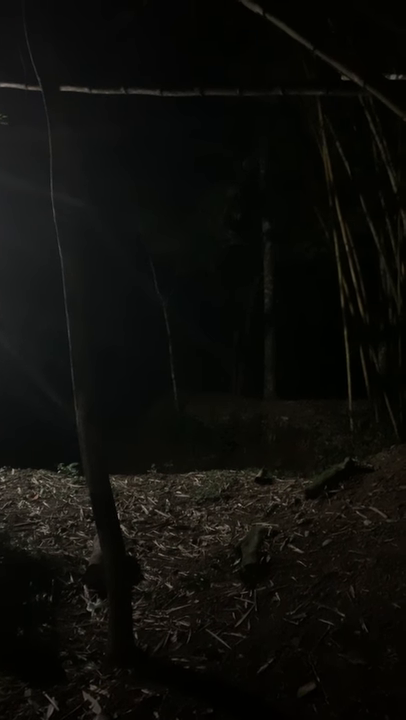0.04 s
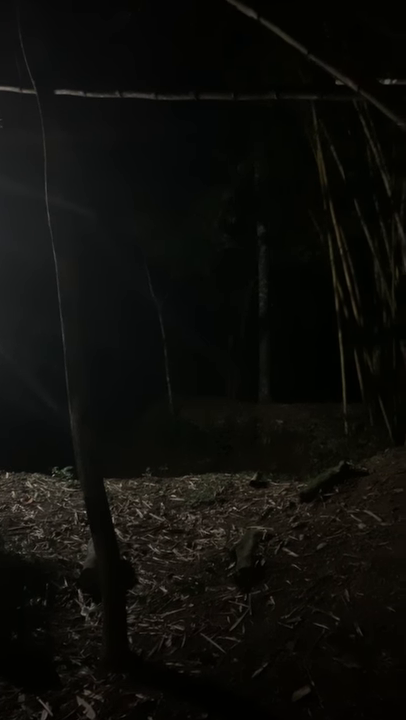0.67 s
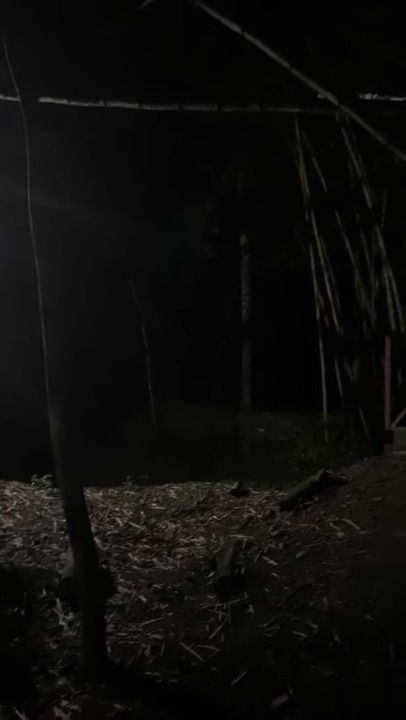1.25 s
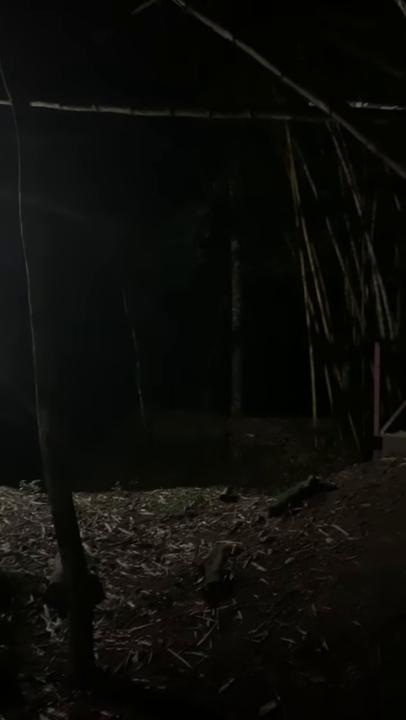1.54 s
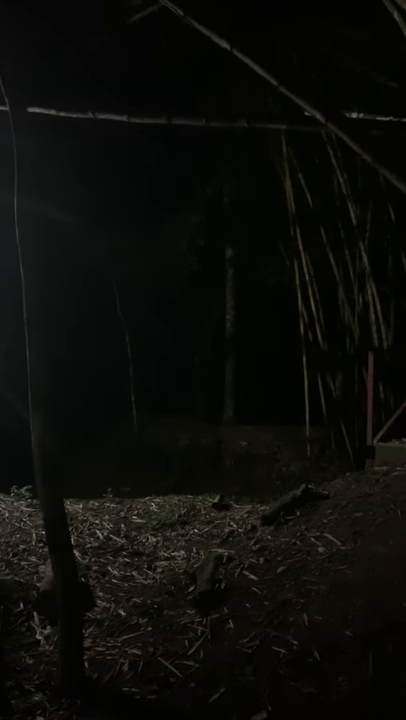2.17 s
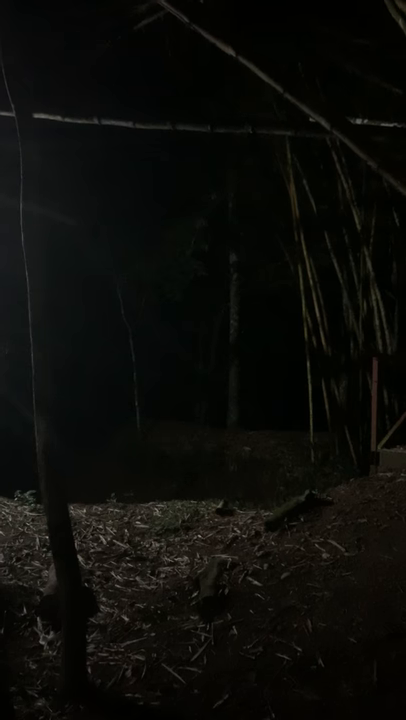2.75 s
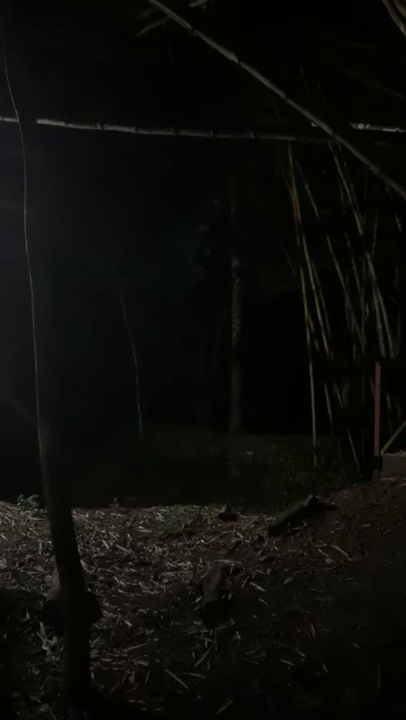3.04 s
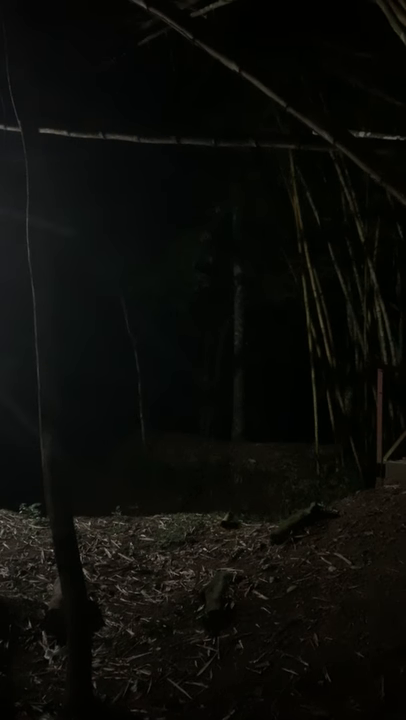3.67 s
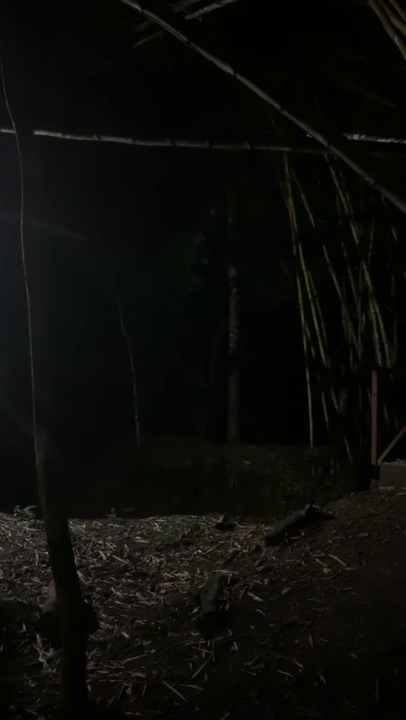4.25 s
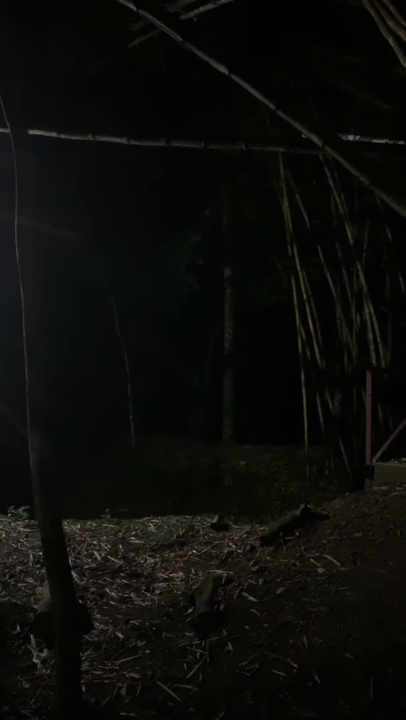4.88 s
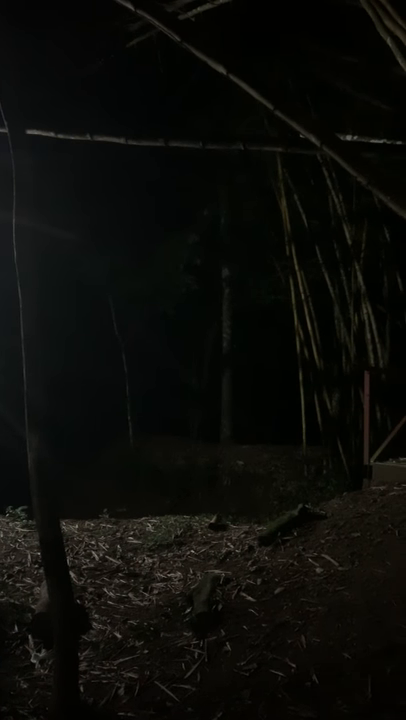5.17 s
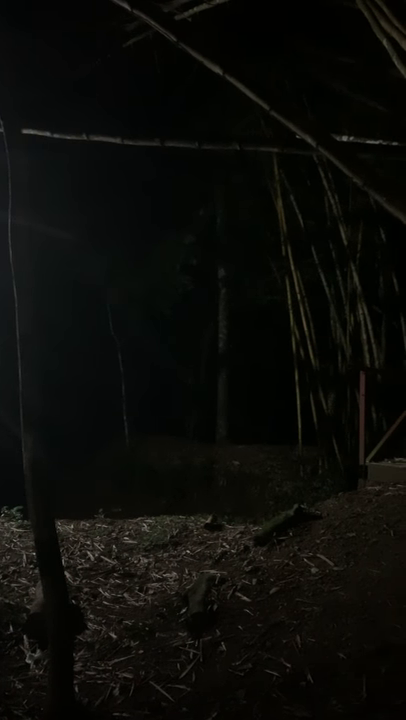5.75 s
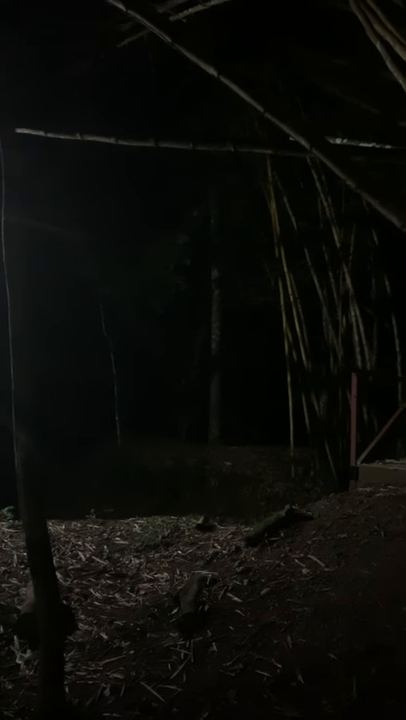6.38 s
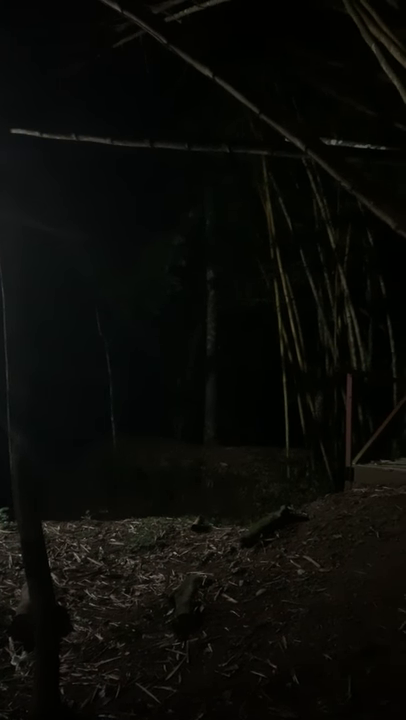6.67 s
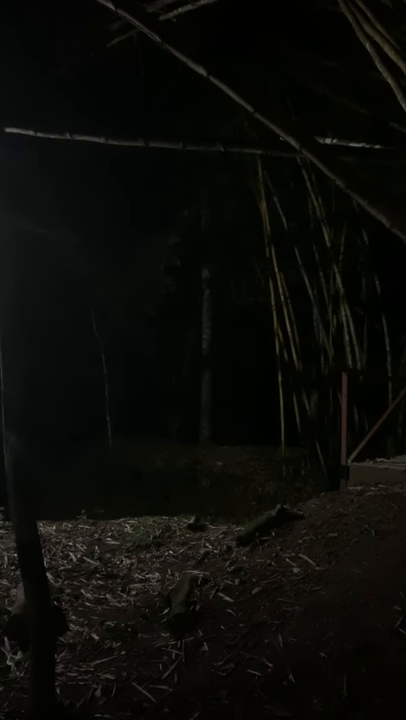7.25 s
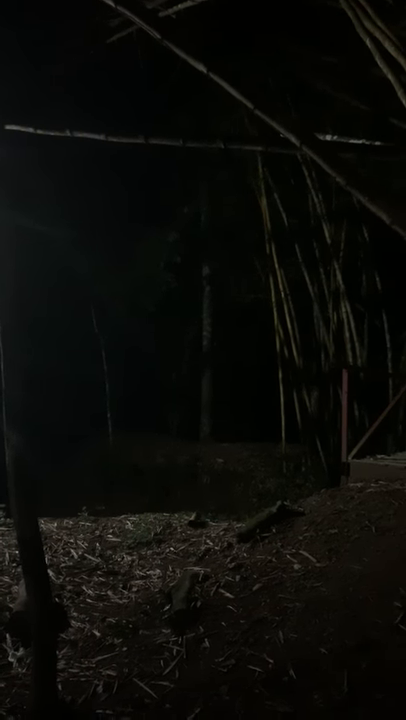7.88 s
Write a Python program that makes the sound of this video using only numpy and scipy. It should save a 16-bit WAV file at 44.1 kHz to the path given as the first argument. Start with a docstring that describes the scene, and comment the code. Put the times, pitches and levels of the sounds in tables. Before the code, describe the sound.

Insects chirr and crickets trill in a jungle at night while distant howler monkeys give ragged roars and hoots, then fade.

```python
"""Howler monkeys roar some way off in a night forest, die away, and start again softly.
Ragged vocal-fold pulses ring the throat sac and mouth; at times the voice locks into a clear hoot.
Far insects chirr throughout; nearer crickets trill over them with their wings.
A thin whistle rises once, something dry rustles, and the hand-held microphone picks up
a low rumble and a few bumps."""
import sys
import numpy as np
from scipy import signal
from scipy.fft import rfft, irfft
from scipy.io import wavfile
from scipy.ndimage import uniform_filter1d

SR = 44100
rng = np.random.default_rng(int(sys.argv[2]) if len(sys.argv) > 2 else 0)


def generate_wav(signal):
    """Clip the signal to [-1, 1] and save it as 16-bit WAV at the path in sys.argv[1]."""
    frames = np.transpose(np.atleast_2d(signal))
    scaled = np.clip(frames, -1, 1) * 32767
    pcm = np.round(scaled).astype(np.int16)
    wavfile.write(sys.argv[1], SR, pcm)


N = 353241
TIME = np.arange(N) / SR
BINS_HZ = np.fft.rfftfreq(N, 1 / SR)

# Wing tones of three chirping crickets. Each row: pitch in Hz, relative level in dB.
HIGH_CHIRP = [(5222, -9), (5310, -12), (5410, -7), (5513, 0), (5612, -9), (5722, -6)]
LOW_CHIRP = [(5228, -10), (5335, -3), (5437, -6), (5536, 0)]
FAST_CHIRP = [(5025, -14), (5224, 0), (5428, -3), (5625, -6)]


def amp(db):
    """Decibels to gain."""
    return 10 ** (np.asarray(db) / 20)


def unit(x):
    """Scale to rms 1."""
    return x / np.sqrt(np.mean(abs(x) ** 2) + 1e-20)


def read(points, hz):
    """Interpolate a table on a log-frequency axis."""
    points_hz, values = np.transpose(points)
    return np.interp(np.log(hz + 1), np.log(points_hz + 1), values)


def curves(rows):
    """One curve per column after the time column; end values hold."""
    times_s, *columns = np.transpose(rows)
    return [np.interp(TIME, times_s, column) for column in columns]


def during(start_s, end_s, fade_s):
    """Gate: 1 from start to end, linear fades outside."""
    return np.clip(np.minimum(TIME - start_s, end_s - TIME) / fade_s + 1, 0, 1)


def envelope(start_s, length_s, attack_s, release_db_per_s):
    """Linear rise, hold, exponential decay."""
    rise = np.clip((TIME - start_s) / attack_s, 0, 1)
    return rise * amp(-release_db_per_s * np.clip(TIME - start_s - length_s, 0, 2))


def wander(rate_hz):
    """Smooth random curve, rms 1."""
    return unit(irfft(rfft(rng.standard_normal(N)) * np.exp(-(BINS_HZ / rate_hz) ** 2), N))


def add(mix, start_s, sound):
    """Mix a sound in, in place."""
    part = mix[max(round(start_s * SR), 0):][:len(sound)]
    part += sound[:len(part)]


def blend(calls):
    """Merge (gain, Hz) curves: powers add, the loudest dominates the pitch."""
    power = sum(gain ** 2 + 1e-20 for gain, hz in calls)
    return np.sqrt(power), sum((gain ** 2 + 1e-20) * hz for gain, hz in calls) / power


def resonate(x, hz, width_hz, order=2):
    """Steep resonance following a frequency curve, rms 1."""
    carrier = np.exp(2j * np.pi * np.cumsum(hz * np.ones(N)) / SR)
    pole = np.exp(-np.pi * width_hz / SR)
    baseband = x / carrier
    for _ in range(order):
        baseband = signal.lfilter([1 - pole], [1, -pole], baseband)
    return unit((carrier * baseband).real)


def sustained(x, window_samples=4000):
    """Level out slow changes, keep fast flutter."""
    return x / np.sqrt(abs(uniform_filter1d(x ** 2, window_samples)) + 1e-6)


def diffuse(pair, spread=1):
    """Correlate two signals as sound from ahead (spread 0) or all round (1)."""
    # Microphone ports in a diffuse field. Each row: frequency in Hz, coherence from 0 to 1.
    coherence = [(100, 1), (230, 0.93), (460, 0.5), (700, 0.36), (1200, 0.14), (2000, 0.69), (3000, 0.87),
                 (4500, 0.94), (6000, 0.91)]
    a, b = rfft(pair)
    same = np.clip(1 - spread * (1 - read(coherence, BINS_HZ)), 0, 1)
    return irfft(np.array([a, same * a + np.sqrt(1 - same ** 2) * b]), N)


def wash(spectrum):
    """Diffuse stereo noise of a given spectrum, rms 1."""
    white = rfft(rng.standard_normal((2, N)))
    return unit(diffuse(irfft(white * amp(read(spectrum, BINS_HZ)), N)))


def forest(x, wet_db, spread=1, tail_samples=32768, echoes_per_s=2000):
    """Direct sound plus sparse echoes from trunks and canopy."""
    # Each row: frequency in Hz, time to decay 60 dB in seconds.
    decay_times = [(200, 0.62), (900, 1), (3000, 1), (7000, 0.6), (14000, 0.45)]
    taps = rng.standard_normal((2, tail_samples)) * (rng.random((2, tail_samples)) < echoes_per_s / SR)
    hz, t, spectra = signal.stft(taps, SR, nperseg=256)
    decay = amp(-60 * t / read(decay_times, hz)[:, None]) * (t > .01)
    tail = signal.istft(spectra * decay, SR, nperseg=256)[1]
    echoes = signal.fftconvolve(x[None], tail, axes=1)[:, :N]
    wet = unit(diffuse(echoes, spread)) * x.std()
    return (x + amp(wet_db) * wet) / np.hypot(1, amp(wet_db))


def folds(pulse_hz, jitter=.25, breath=.5, uneven_db=5.5):
    """Slack vocal folds slap unevenly, each slap with a puff of air. Returns drive and throb."""
    turns = np.cumsum(pulse_hz * np.exp(jitter * wander(45))) / SR
    cycle = np.floor(turns).astype(int)
    force = unit(amp(uneven_db * rng.random(N))[cycle])
    slaps = np.diff(cycle, prepend=0)
    puffs = (2.4 + np.exp(-(turns % 1) / .5)) * rng.standard_normal(N)
    drive = force * ((1 - breath) * unit(slaps) + breath * unit(puffs))
    return drive, force * np.sin(np.pi * turns) ** 2


def howl(drive, throb, hz, width_hz, tone_share, wobble, depth):
    """A resonance both rung by the pulses and sounding by itself, swelling once per pulse."""
    phase = 2 * np.pi * np.cumsum(hz * (1 + wobble * wander(59.3))) / SR
    tone = unit(np.sin(phase) * (1 - depth + depth * throb))
    ring = resonate(drive, hz, width_hz)
    return sustained(np.sqrt(tone_share) * tone + np.sqrt(1 - tone_share) * ring)


def gestures(sac_sag=.1, widest_at=.807):
    """Gain and pitch curves of the roars: the mouth opens, then closes, as the sac's pitch sinks."""
    # Roars and growls. Each row: start and length in seconds, relative sac, mouth and bray levels
    # in dB, then sac, first mouth and last mouth resonance in Hz.
    roars = [(-.1, 0.7, -40, -36.5, -55, 469.2, 913.2, 863.4),
             (0.479, 0.38, -41.5, -35.5, -52.5, 435.4, 897.3, 875.5),
             (0.818, 0.31, -48, -49, -52, 405, 870, 843.2),
             (1.069, .24, -39, -38.5, -57, 462.5, 944.3, 898.3),
             (1.24, 0.42, -40.5, -32, -54.5, 446, 895.4, 837.1),
             (1.6, 0.21, -44.5, -47.5, -55.5, 374.6, 841, 822.6),
             (1.817, 0.3, -47, -45, -58.5, 445, 852, 843),
             (2.027, 0.43, -39.5, -37.5, -60, 469.4, 882.7, 824),
             (2.429, .13, -43, -47, -62.5, 446.6, 784, 726.3),
             (2.83, .3, -49.5, -50, -74, 443.6, 784.6, 689),
             (3.104, 0.2005, -52.5, -51, -96, 442.2, 725, 710),
             (3.275, 0.16, -56, -55, -74.5, 432, 736, 702), (3.44, 0.29, -59.5, -63.5, -74, 425, 709, 692),
             (3.777, 0.273, -66.5, -66, -72, 424, 838, 749),
             (7.511, 0.3, -63.5, -93.5, -102, 417, 694, 720), (7.84, 0.45, -60.5, -60, -107, 434, 715, 706)]
    sac, mouth, bray_power = [], [], 0
    for start_s, length_s, sac_db, mouth_db, bray_db, sac_hz, first_hz, last_hz in roars:
        push = envelope(start_s, length_s, attack_s=.0877, release_db_per_s=109.5)
        progress = np.clip((TIME - start_s) / length_s, 0, 1)
        glide = progress ** 1.2
        open_db = np.interp(progress, [0, widest_at, 1], [-5.5, 0, -4.5])
        sac.append((amp(sac_db) * push, sac_hz * (1 - sac_sag * glide)))
        mouth.append((amp(mouth_db + open_db) * push, first_hz + (last_hz - first_hz) * glide))
        bray_power += (amp(bray_db) * push) ** 2
    return (*blend(sac), *blend(mouth), np.sqrt(bray_power))


def roar(mouth_rest_hz=850, bray_air=1.1, highpass_hz=190):
    """Fold pulses ring the throat sac, the mouth and the upper throat resonances (the bray)."""
    # Weak modes beside the sac; bray modes. Each row: centre in Hz, width in Hz, relative level in dB.
    sac_modes = [(248.7, 38.5, -16), (342.6, 52, -23.5), (500.7, 12, -11.5), (582, 99, -13.5),
                 (709, 74, -14.5)]
    bray_modes = [(1092, 210, -4.5), (1233, 70, -7), (1346.4, 100, -5), (1825, 150, -11),
                  (2730, 400, -18.5), (3100, 160, -14), (3695, 730, -17.5), (4350, 2100, -7)]
    drive, throb = folds(pulse_hz=64 * np.exp(.16 * wander(5)))
    sac_gain, sac_hz, mouth_gain, mouth_hz, bray_gain = gestures()
    effort = np.interp(20 * np.log10(sac_gain), [-62, -42], [.2, 1])  # soft calls are breathier
    jaw = (1 + .015 * wander(4.3)) * (mouth_hz / mouth_rest_hz) ** .25  # modes partly track the mouth

    def ring(source, modes):
        return sum(amp(db) * resonate(source, hz * jaw, width_hz, order=3) for hz, width_hz, db in modes)

    surge = amp(-2 + 2.26 * wander(93))
    sac_hz = sac_hz * (1 + .00683 * wander(8.42))
    sac = howl(drive, throb, sac_hz, width_hz=142, tone_share=.7 * effort, wobble=.023, depth=.5)
    sac = surge * sac + ring(drive, sac_modes)
    mouth_hz = mouth_hz * (1 + .018 * wander(13.91))
    mouth = howl(drive, throb, mouth_hz, width_hz=149, tone_share=.62 * effort, wobble=.02777, depth=.62)
    bray = ring(unit(drive + bray_air * rng.standard_normal(N)), bray_modes)
    voice = sac_gain * sac + amp(-1.26) * mouth_gain * mouth + bray_gain * bray
    return signal.sosfilt(signal.butter(4, highpass_hz, "high", fs=SR, output="sos"), voice)


def rasp(flutter_db=3):
    """A narrow, pulsing high note cuts in and out when the mouth gapes."""
    # Each row: start and length in seconds, first and last pitch in Hz, relative level in dB.
    rasps = [(-.05, 0.083, 2165, 2155, -59), (.52, 0.054, 1995, 2006, -53.5),
             (0.6, 0.053, 1939, 1944, -58.5), (0.67, .05, 1990, 2010, -51), (0.789, 0.059, 1930, 1963, -54),
             (0.863, 0.063, 1990, 1980, -49.5), (0.972, 0.038, 2015, 2000, -55),
             (1.029, 0.041, 1943, 1916, -49), (1.254, .04, 2210, 2175, -62),
             (1.317, 0.044, 2137, 2100, -57), (1.397, .24, 2095, 2054, -60.5), (1.68, 0.2, 1813, 1723, -67),
             (2.5, 0.2, 1784, 1770, -75.5), (7.88, 0.023, 2037, 1994, -76)]
    calls = []
    for start_s, length_s, first_hz, last_hz, db in rasps:
        push = amp(db) * envelope(start_s, length_s, attack_s=.015, release_db_per_s=317)
        calls.append((push, np.interp(TIME, [start_s, start_s + length_s], [first_hz, last_hz])))
    gain, hz = blend(calls)
    drive, throb = folds(pulse_hz=64)
    note = howl(drive, throb, hz, width_hz=130, tone_share=.66, wobble=.009, depth=.6)
    return gain * unit(amp(flutter_db * wander(27))) * note


def chorus(level_db=-56, throb_db=.84, chirr_db=.85):
    """Countless far insects merge into a band of chirring."""
    # Each row: time in seconds, level change in dB.
    swell = [(0, 1), (.8, -1), (2.8, 1.5), (4.7, 1), (5.1, -1.5), (5.55, 1.5), (6.1, 0.5), (8, .5)]
    # Each row: frequency in Hz, relative density in dB.
    spectrum = [(2900, -28.5), (3500, -23.5), (3900, -12), (4200, -6), (4700, -9.5), (5200, -5.5),
                (5700, -4), (6150, 1.5), (6600, -6.5), (7000, -13), (7400, -22.5), (7800, -28.5),
                (8400, -52.5)]
    gain = amp(level_db + curves(swell)[0] + throb_db * wander(20) - chirr_db * wander(220))
    return gain * wash(spectrum)


def rumble(air_db=-57, hum_hz=74, bump_s=.0069):
    """Night air, a distant wavering hum and soft bumps of the hand on the microphone."""
    # Each row: frequency in Hz, relative density in dB.
    air_spectrum = [(20, -2), (55, 1.5), (100, -1), (170, -3.5), (300, -11.5), (550, -19.5), (800, -23.5),
                    (1100, -32.5), (1400, -29), (2000, -43.5), (2700, -46.5), (8000, -62.5), (10500, -39.5),
                    (15000, -58)]
    # Each row: time in seconds, level in dB.
    hum_levels = [(0, -53.5), (1.5, -64.5), (3.2, -57.5), (4.5, -65), (8, -66.5)]
    # Each row: time in seconds, pitch in Hz, peak in dB.
    hand_bumps = [(1.295, 44, -37.5), (1.689, 38.7, -45.5), (4.655, 56, -46)]
    hum = amp(curves(hum_levels)[0]) * sustained(resonate(rng.standard_normal(N), hum_hz, width_hz=7.6))
    air = amp(air_db + 1.23 * wander(13)) * wash(air_spectrum)
    bumps = sum(amp(db) * np.exp(-((TIME - at_s) / bump_s) ** 2) * np.cos(2 * np.pi * hz * (TIME - at_s))
                for at_s, hz, db in hand_bumps)
    return air + hum + bumps


def far_forest(patchy_db=2):
    """Faint, patchy stirring deep among the trees."""
    # Each row: time in seconds, level in dB.
    levels = [(4.3, -69), (4.6, -87.5), (5.2, -99), (5.85, -70), (6.4, -81.5), (7.15, -83), (7.6, -91)]
    # Each row: centre in Hz, width in Hz, relative level in dB.
    modes = [(420, 83, 1), (776, 170, 0), (1505, 230, -15)]
    patches = sum(amp(db + patchy_db * wander(24)) * resonate(rng.standard_normal(N), hz, width_hz)
                  for hz, width_hz, db in modes)
    return amp(curves(levels)[0]) * unit(patches)


def hoots(octave_db=-20, octave_top_hz=1000, fade_s=.013):
    """The voice locks onto the sac or mouth resonance, almost pure; low hoots keep a weak octave."""
    # Each row: start and end in seconds, first and last pitch in Hz, relative level in dB.
    calls = [(0.021, 0.067, 457, 466, -34.5), (0.1, 0.166, 468, 456, -37.5),
             (0.173, 0.211, 446, 443, -34.5), (0.244, 0.284, 435, 441, -29),
             (0.299, 0.34, 454.5, 423, -36.5), (0.508, 0.545, 442, 459, -40.5),
             (0.59, 0.712, 350.4, 325.5, -45.5), (0.682, 0.707, 890, 860, -33),
             (0.892, 1.04, 387, 394.7, -32.5), (1.064, 1.152, 398, 425.6, -38),
             (1.154, 1.285, 460, 438, -41), (1.385, 1.433, 876.2, 890, -39.5),
             (1.435, 1.481, 290, 281, -44), (1.572, 1.674, 350, 341, -37.5),
             (1.594, 1.668, 867, 825, -33.5), (1.695, 1.81, 395, 364, -54), (1.836, 1.887, 284.1, 256, -45),
             (1.943, 2.107, 264.6, 261.5, -51), (2.095, 2.188, 471.6, 449, -38.5),
             (2.393, 2.478, 828.4, 803, -36.5), (2.431, 2.484, 250, 230.5, -46.5),
             (2.445, 2.65, 439, 410.3, -39.5), (2.572, 2.666, 733, 709, -47),
             (2.833, 2.874, 424.5, 415, -42), (2.894, 2.954, 419.3, 409, -40),
             (2.969, 3.09, 420, 417.5, -45), (3.102, 3.279, 415, 400.9, -49.5)]
    out = np.zeros(N)
    waver = 1 + .011 * wander(40)
    flutter = amp(2.5 * wander(30))
    for start_s, end_s, first_hz, last_hz, db in calls:
        hz = np.interp(TIME, [start_s, end_s], [first_hz, last_hz]) * waver
        phase = 2 * np.pi * np.cumsum(hz) / SR
        octave = amp(octave_db) * (2 * first_hz < octave_top_hz)
        gate = during(start_s + fade_s, end_s - fade_s, fade_s)
        out += amp(db) * gate * (np.sin(phase) + octave * np.sin(2 * phase))
    return out * flutter


def trill(length_s, tones, pitch_ratio=1, strokes_per_s=100, rise_s=.035, fade_s=.075):
    """Wing strokes sound as a few close, scratchy tones; each sways and swells on its own."""
    detune_hz, swell_db, roughness = 5, 3, .13
    t = np.arange(0, length_s, 1 / SR)
    strokes_s = np.arange(0, length_s, 1 / strokes_per_s)
    song = 0
    for hz, db in tones:
        sway, swell = np.sin(2 * np.pi * (rng.uniform(1.5, 5, (2, 1)) * t + rng.random((2, 1))))
        pitch_hz = hz * pitch_ratio + detune_hz * rng.standard_normal()
        per_stroke = rng.standard_normal((2, len(strokes_s)))
        force, slip = (roughness * np.interp(t, strokes_s, values) for values in per_stroke)
        phase = 2 * np.pi * (pitch_hz * t + .14 * sway + rng.random()) + slip
        song = song + amp(db + swell_db * swell) * (1 + force) * np.sin(phase)
    return unit(song * np.clip(np.minimum(t / rise_s, (length_s - t) / fade_s), 0, 1))


def crickets(chirp_s=.35, far_db=-68, far_detune=.05, far_count=36):
    """Near crickets chirp and trill over fainter ones at random times."""
    # Each row: start in seconds, wing tones, level in dB.
    chirps = [(0.12, HIGH_CHIRP, -57.5), (0.619, LOW_CHIRP, -58), (1.373, HIGH_CHIRP, -54.5),
              (1.95, LOW_CHIRP, -55.5), (2.428, HIGH_CHIRP, -57.5), (3.19, LOW_CHIRP, -57),
              (3.299, HIGH_CHIRP, -59), (4.3, FAST_CHIRP, -57), (4.541, LOW_CHIRP, -53),
              (4.6, HIGH_CHIRP, -55.5), (5.631, HIGH_CHIRP, -54), (6.211, LOW_CHIRP, -56.5),
              (6.797, HIGH_CHIRP, -53.5), (7.493, LOW_CHIRP, -57), (7.935, HIGH_CHIRP, -56)]
    # Wing tones of two trilling crickets. Each row: pitch in Hz, relative level in dB.
    wide_trill = [(4875, -2), (4937, -2), (4995, -10), (5057, -6), (5120, -10), (5178, -10), (5233, -2.5),
                  (5292, -7), (5412, -8)]
    centred_trill = [(4845, -8), (4895, -8), (4960, -13), (5020, -5), (5078, 0), (5135, -9), (5215, -9),
                     (5268, -5)]
    # Longer, lower songs. Each row: start and length in seconds, wing tones, level in dB.
    trills = [(.558, .72, wide_trill, -51), (3.123, .57, centred_trill, -52),
              (5.157, .8, wide_trill, -51.5), (7.294, .65, centred_trill, -57),
              (7.685, .4, wide_trill, -51)]
    out = np.zeros(N)
    for when, extra_s, pitch in rng.random((far_count, 3)):
        song = trill(.18 + extra_s, LOW_CHIRP, pitch_ratio=1 + far_detune * (pitch - .5))
        add(out, when * N / SR, amp(far_db) * song)
    for start_s, tones, db in chirps:
        add(out, start_s, amp(db) * trill(chirp_s, tones))
    for start_s, length_s, tones, db in trills:
        add(out, start_s, amp(db) * trill(length_s, tones))
    return out


def scratch(length_s, hz, width_hz):
    """A band of hiss that swells and fades, rms 1."""
    offset = (np.fft.rfftfreq(SR, 1 / SR) - hz) / width_hz
    band = irfft(rfft(rng.standard_normal(SR)) / (1 + offset ** 2) ** 3)
    note = band[:int(length_s * SR)]
    return unit(note * signal.windows.tukey(len(note), .6))


def pips_and_buzzes():
    """Single insects give sharp pips and longer buzzes."""
    # Each row: start in seconds, pitch in Hz, level in dB.
    pips = [(0.649, 7320, -63), (0.761, 7210, -65), (1.13, 7330, -66), (1.478, 7230, -59.5),
            (1.54, 7160, -67), (2.711, 7200, -63.5), (2.91, 7350, -65), (3.159, 4490, -53.5),
            (3.31, 7370, -64.5), (3.453, 4230, -54), (3.62, 7230, -61), (3.702, 7200, -67),
            (4.61, 7400, -70.5), (4.76, 7170, -64.5), (5.721, 7340, -63.5), (6.71, 7160, -59),
            (7.799, 7360, -61), (7.88, 7350, -60.5)]
    # Each row: start and length in seconds, pitch and width in Hz, level in dB.
    buzzes = [(1.979, 0.68, 4410, 1500, -62.5), (2.253, 0.14, 14070, 420, -64),
              (4.14, 0.26, 3910, 25, -67.5), (4.616, .55, 15200, 1190, -82),
              (5.351, 0.52, 4460, 560, -60.5), (6.125, .11, 14000, 600, -72.5)]
    out = np.zeros(N)
    for start_s, hz, db in pips:
        add(out, start_s, amp(db) * scratch(length_s=.048, hz=hz, width_hz=140))
    for start_s, length_s, hz, width_hz, db in buzzes:
        add(out, start_s, amp(db) * scratch(length_s, hz, width_hz))
    return out


def ticks():
    """Tiny high ticks, perhaps from dry leaves."""
    # Each row: start in seconds, level in dB.
    events = [(.8, -90), (1.385, -84), (2.265, -79), (2.98, -86), (3.15, -75)]
    out = np.zeros(N)
    for start_s, db in events:
        add(out, start_s, amp(db) * scratch(length_s=.008, hz=12500, width_hz=5000))
    return out


def whistle(trim_db=-2, width_hz=150, third_db=-21, sputter_db=3.6):
    """A fuzzy whistle with weak overtones glides upward."""
    # Each row: time in seconds, pitch in Hz, relative level in dB.
    glide = [(2.671, 866, -73), (2.73, 1050, -57), (2.8, 1285, -64), (2.88, 1340, -62.5),
             (2.931, 1470, -56), (3.0, 1630, -68), (3.1, 1760, -68), (3.14, 2090, -68.5), (3.24, 2384, -60),
             (3.35, 2590, -66), (3.45, 2810, -63), (3.52, 3240, -70.5), (3.75, 3430, -66),
             (4.1, 3510, -69.5)]
    # Each row: whistle pitch in Hz, relative level of the second harmonic in dB.
    overtone = [(1000, -10), (1300, -6), (1700, -10), (2200, -16), (3500, -28)]
    hz, db = curves(glide)
    hiss = rng.standard_normal(N)
    tone = 0
    for k, partial_db in enumerate([0, read(overtone, hz), third_db], 1):
        partial = resonate(hiss, k * hz, np.sqrt(k) * width_hz, order=3)
        tone = tone + amp(partial_db) * sustained(partial, window_samples=500)
    sputter = unit(amp(sputter_db * wander(35)))
    return amp(db + trim_db) * sputter * tone * during(glide[0][0], glide[-1][0], fade_s=.05)


def rustle():
    """A soft brush of something dry close by."""
    # Each row: time in seconds, level in dB.
    levels = [(3.799, -84), (3.91, -65.5), (4.0, -70.5), (4.09, -68), (4.2, -73), (4.5, -84)]
    # Each row: frequency in Hz, relative density in dB.
    spectrum = [(500, -27), (1000, -9), (2300, -3.5), (4000, -3), (7000, -25), (9000, -50)]
    return amp(curves(levels)[0]) * during(levels[0][0], levels[-1][0], fade_s=.059) * wash(spectrum)


def scene():
    """Monkeys and insects among the trees, in stereo."""
    monkeys = forest(roar(), wet_db=-3.5, spread=.54) + forest(hoots(), wet_db=-6, spread=.54)
    monkeys += forest(rasp(), wet_db=-7)
    monkeys *= amp([[.2], [-.2]])  # a touch to the left
    insects = forest(crickets(), wet_db=-6) + forest(pips_and_buzzes(), wet_db=0) + chorus()
    near_whistle = forest(whistle(), wet_db=-9)
    stirring = forest(far_forest(), wet_db=4)
    return monkeys + insects + near_whistle + stirring + rustle() + ticks() + rumble()


def record(dry, lowpass_hz=15700):
    """The two microphone ports hear each frequency out of step; a low-pass follows."""
    # Each row: frequency in Hz, phase lead of left over right in radians.
    port_lead = [(150, 0), (430, -.35), (1000, -.35), (1550, .1), (2000, .8), (2500, 2.1), (3300, 1.5),
                 (3900, 1.8), (4850, 3.14), (6800, 6.25), (7600, 6.7), (10000, 10.8), (14000, 14.5)]
    half_lead = np.exp(.5j * read(port_lead, BINS_HZ))
    ported = irfft(rfft(dry) * np.array([half_lead, 1 / half_lead]), N)
    lowpass = signal.firwin(511, lowpass_hz, window=("kaiser", 9), fs=SR)
    return signal.oaconvolve(ported, lowpass[None], "same")


dry = scene()
out = record(dry)
generate_wav(out)
```